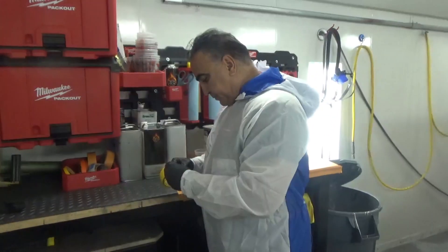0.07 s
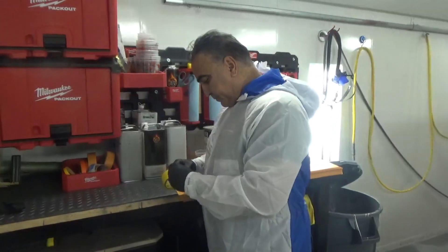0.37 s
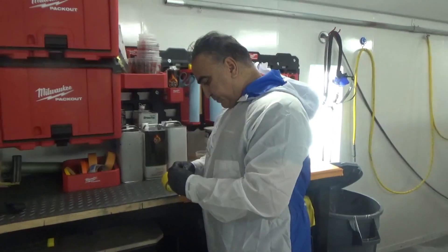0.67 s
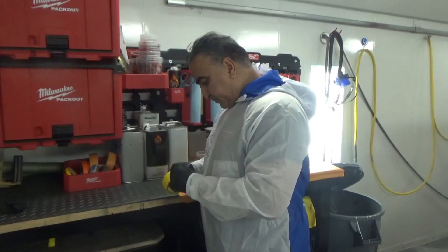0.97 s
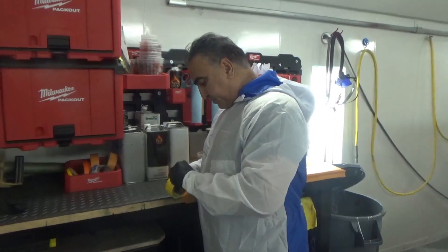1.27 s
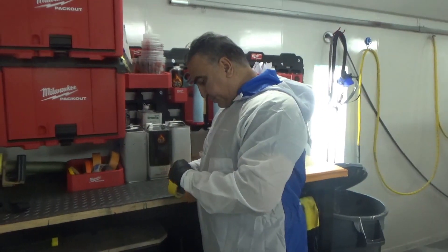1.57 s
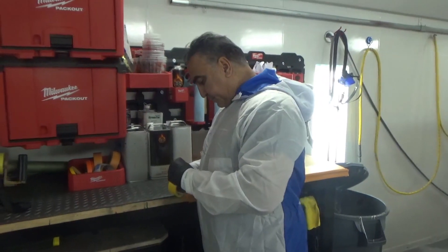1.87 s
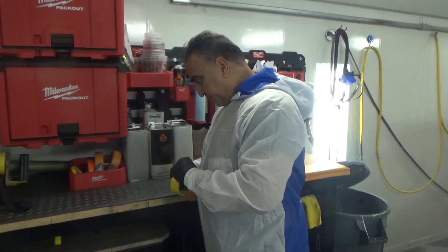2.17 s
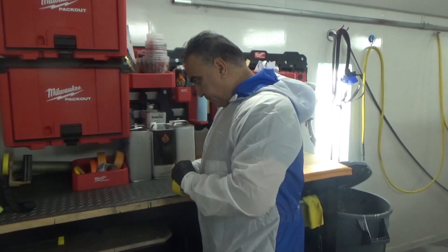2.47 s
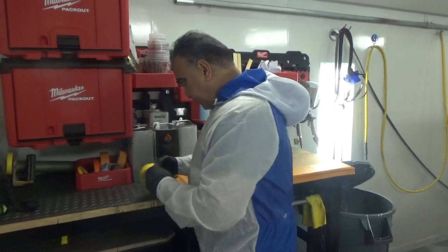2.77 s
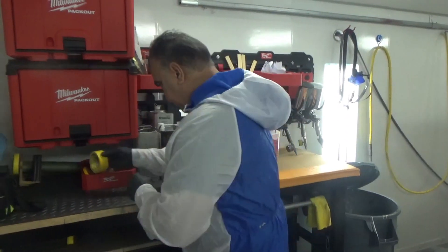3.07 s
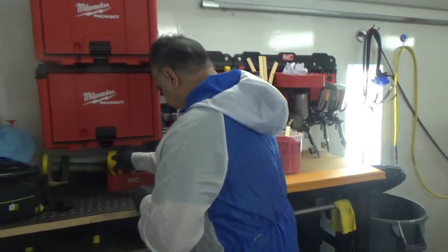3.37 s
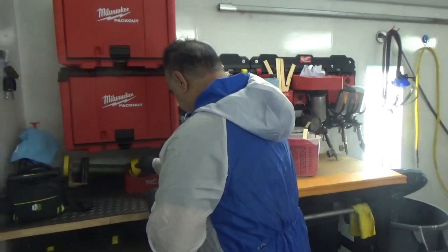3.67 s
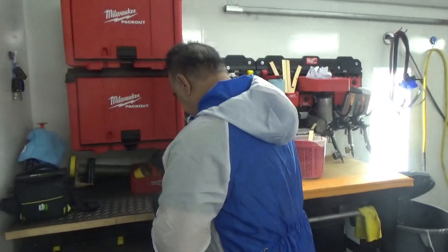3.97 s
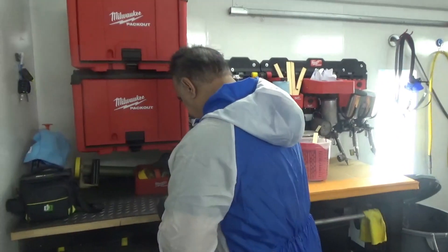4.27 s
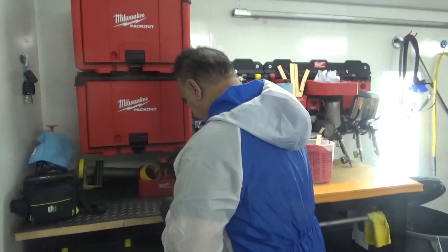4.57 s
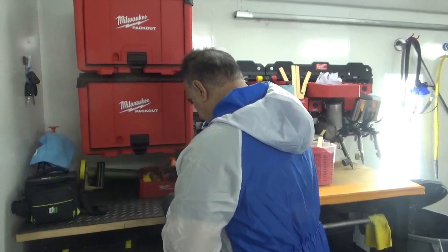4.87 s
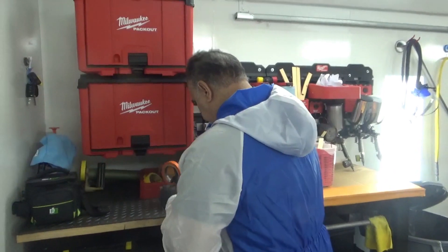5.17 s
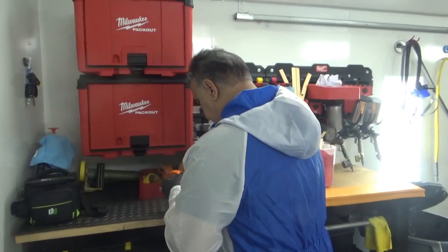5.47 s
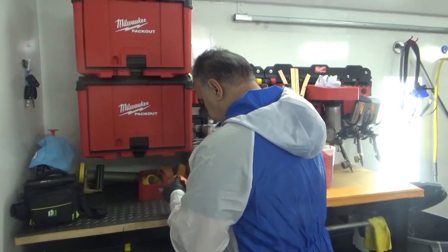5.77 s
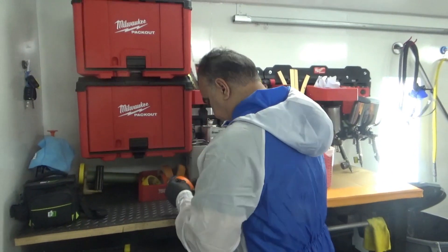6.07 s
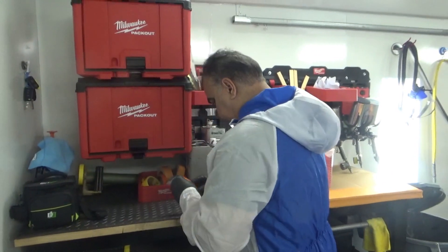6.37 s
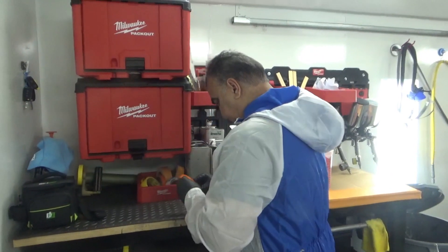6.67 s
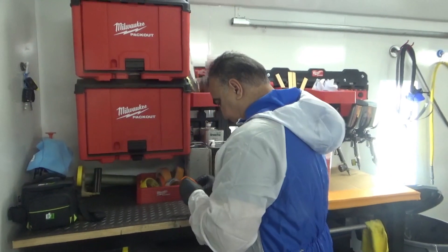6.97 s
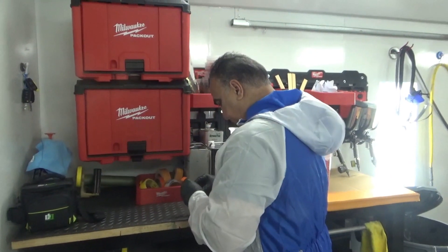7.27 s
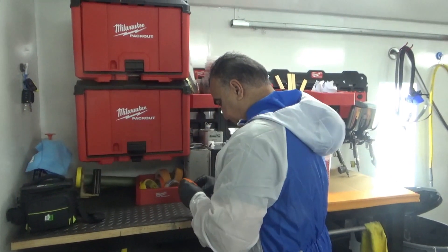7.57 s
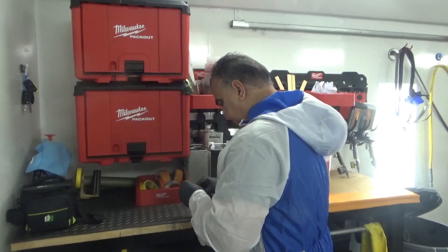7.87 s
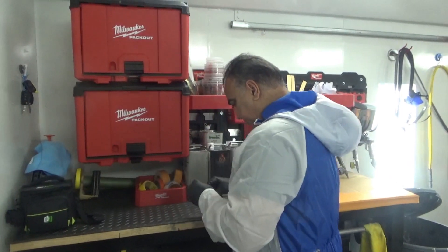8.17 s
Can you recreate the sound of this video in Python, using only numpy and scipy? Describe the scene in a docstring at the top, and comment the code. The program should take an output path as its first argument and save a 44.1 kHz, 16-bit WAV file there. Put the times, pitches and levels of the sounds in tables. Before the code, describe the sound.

Steady airy fan noise and a low hum fill a workshop, briefly joined by soft knocks and rustling as someone rummages.

```python
"""A hard-walled workshop booth, heard on a stereo pair amid steadily running ventilation fans.
Air hisses through the filter grilles and booms in the ducts, over the hum of the chopping blades
and a few thin motor whines. Midway someone rummages on the bench: a sleeve rustles along
a plastic tray and things bump dully in it, each bump ringing briefly off the walls."""
import sys
import numpy as np
from scipy import signal
from scipy.fft import rfft, irfft
from scipy.io import wavfile

SR = 44100
rng = np.random.default_rng(int(sys.argv[2]) if len(sys.argv) > 2 else 0)


def persist_wave(psi):
    """Save psi, clipped to +-1, as 16-bit WAV."""
    counts = np.round(np.clip(psi, -1, 1) * 32767).astype(np.int16)
    wavfile.write(sys.argv[1], SR, np.atleast_2d(counts).T)


N = 366030
TIME, BINS = np.arange(N) / SR, np.fft.rfftfreq(N, 1 / SR)


def airflow(crossover_hz=60):
    """Turbulent air, coloured by the ducts; the deep boom surges while the hiss barely stirs."""
    # rushing air: (frequency [Hz], density [dB per Hz])
    air = [(10, -67), (28, -70), (52, -69), (70, -66), (150, -65), (250, -64.5), (400, -65.5), (700, -64),
           (1050, -65), (3200, -65), (6200, -65), (8600, -65), (9800, -67.5), (11000, -76)]
    # duct resonances: (frequency [Hz], width [Hz], peak density [dB per Hz])
    ducts = [(40, 3.9, -54), (69.7, 5, -62), (86, 6.1, -59.5), (119.6, 4.6, -61.5), (206.3, 3.2, -51),
             (1634, 260, -63.5)]
    # surges of the boom: (time [s], relative level [dB])
    surges = [(0.3, -51), (0.75, -50), (0.88, -44.5), (3.0, -47), (3.07, -42), (5.72, -45.5), (6.76, -55),
              (6.9, -47), (8.0, -46)]
    power = gain_of(spectrum(air)) ** 2 + sum(resonance(*row) ** 2 for row in ducts)
    density = np.sqrt(power) * standing_waves(spacing_hz=11, depth_db=2.5)
    deep_share = 1 / (1 + (BINS / crossover_hz) ** 8)
    boom = noise_pair(density * np.sqrt(deep_share)) * swell(surges)
    hiss = noise_pair(density * np.sqrt(1 - deep_share)) * gain_of(0.12 * drift(rate_hz=2.4))
    return boom + hiss


def fan_hum(shaft_hz=29.25):
    """Four blades chop the air at multiples of the shaft speed; uneven inflow makes each tone flutter."""
    # fan tones: (shaft multiple, level [dB], right over left [dB], left lead [rad], flutter [share])
    tones = [(4, -46, -1, 0.52, 0.31), (8, -29.5, 3.5, 0.63, 0.095), (12, -39, 2, 0.7, 0.24),
             (16, -47, -3, 0.33, 0.2), (19, -54, 3, -0.16, 0.33), (20, -39, 1.5, -0.41, 0.16),
             (23, -51, 1, 0.15, 0.33), (24, -55.5, 0, -0.065, 1)]
    turns = np.cumsum(shaft_hz * (1 + 0.00028 * drift(rate_hz=0.35))) / SR
    out = np.zeros((2, N))
    for multiple, db, right_db, lead, flutter in tones:
        phasor = np.exp(2j * np.pi * (round(multiple) * turns + rng.random()))
        phasor *= 1 + flutter * (drift(rate_hz=8.7) + 1j * drift(rate_hz=2.4)) / np.sqrt(2)
        mics = np.array([[gain_of(-right_db / 2)], [gain_of(right_db / 2) * np.exp(-1j * lead)]])
        out += np.sqrt(2) * gain_of(db) * (mics * phasor).real
    return out


def tray_bumps():
    """Each soft blow sets the tray's short modes ringing together, centred between the microphones."""
    # blows: (time [s], peak level [dB], brightness [dB per octave])
    blows = [(3.223, -20, -2), (3.812, -19, -2), (4.422, -25, -1), (4.546, -14.5, 2), (4.571, -20, 9),
             (4.822, -18, -1.5), (4.844, -20, 5), (4.886, -14.5, 0), (4.936, -22, 3), (4.963, -20.5, 5)]
    # modes of the plastic tray: (frequency [Hz], relative level [dB], t60 [s])
    modes = [(180, -3, 0.045), (294, 1, 0.05), (408, 5, 0.032), (494, 3.5, 0.042), (584, 4.5, 0.029),
             (690, 7, 0.022), (870, 4.5, .03), (968, -0.5, 0.032), (1610, -2, .02)]
    t, out = np.arange(SR // 4) / SR, np.zeros(N)
    for start, db, tilt_db in blows:
        ring = np.zeros(len(t))
        for hz, mode_db, t60 in modes:
            decay = gain_of(mode_db + tilt_db * np.log2(hz / 500) - 60 * t / t60)
            detuned_hz = hz * (1 + 0.029 * rng.standard_normal())
            ring += decay * np.sin(2 * np.pi * detuned_hz * t)
        ring *= 1 - np.exp(-t / 0.0053)  # a soft contact takes a moment to build
        add(out, start, gain_of(db) * ring / abs(ring).max())
    return out


def sleeve_rustle():
    """Cloth catches and slips during each stroke, so the rubbing comes in small clumps."""
    # colour of the rubbing: (frequency [Hz], relative density [dB])
    colour = [(40, -35), (170, 1), (560, -3), (720, -7), (920, -10), (1300, -5.5), (3000, -35),
              (10000, -37)]
    # strokes along the tray: (start [s], length [s], level [dB])
    strokes = [(3.8, .12, -36), (4.393, 0.3, -36.5), (4.82, .16, -31.5)]
    clumps = gain_of(1.4 * np.tanh(drift(rate_hz=45)))
    pressure = sum(gain_of(db) * stroke(start, length) for start, length, db in strokes)
    return unit_rms(noise_pair(gain_of(spectrum(colour))) * clumps) * pressure


def stroke(start, length, attack_s=0.025, release_s=0.04):
    """A stroke builds up, holds while the arm moves and dies away."""
    attack = np.clip((TIME - start) / attack_s, 0, 1)
    return attack * np.exp(-np.maximum(TIME - start - length, 0) / release_s)


def grilles():
    """Each filter grille sings breathily and swells by itself in the turbulent stream."""
    # grille resonances: (frequency [Hz], width [Hz], peak density [dB per Hz])
    bands = [(2074, 280, -62.5), (4870, 490, -65), (5460, 83, -70.5), (7380, 800, -69), (7840, 430, -69.5)]
    air = rfft(noise_pair(standing_waves(spacing_hz=16, depth_db=3.5)))
    return sum(irfft(air * resonance(*row), N) * unit_rms(gain_of(drift(rate_hz=8.4))) for row in bands)


def eddy_whistles(eddies_per_s=1.4, eddy_s=0.25, level_db=-41.5, spread_db=6):
    """Eddies pass at random; each sharpens one grille's hiss into a faint short whistle."""
    # whistling grilles: (frequency [Hz])
    pitches = [4840, 7800]
    out = np.zeros(N)
    for hz in pitches:
        tone = unit_rms(irfft(rfft(rng.standard_normal(N)) * resonance(hz, width_hz=100, db=0), N))
        arrivals = rng.random(N) < eddies_per_s / len(pitches) / SR
        strength = gain_of(level_db + spread_db * rng.uniform(-1, 1, N))
        out += tone * signal.oaconvolve(arrivals * strength, np.hanning(round(eddy_s * SR)), "same")
    return out


def motor_whine():
    """Faint high tones of the motors fade in and out in the moving air."""
    # whines: (frequency [Hz], level [dB])
    whines = [(1669, -54), (2135, -49), (2340, -57), (3481, -54.5), (5440, -56), (7586, -53), (9709, -70),
              (9826, -55)]
    out = np.zeros(N)
    for hz, db in whines:
        phase = 2 * np.pi * hz * TIME + drift(rate_hz=3.7)
        out += gain_of(db) * unit_rms((1 + 0.5 * drift(rate_hz=3.7)) * np.sin(phase))
    return out


def booth_echo(x):
    """Dense reflections off the walls, different at each microphone, the treble dying first."""
    # ring of the booth: (frequency [Hz], t60 [s])
    ring_times = [(150, 0.33), (1000, .3), (8000, 0.15)]
    hz, t, noise = signal.stft(rng.standard_normal((2, SR // 2)), SR, nperseg=256)
    decay = gain_of(-60 * t / spectrum(ring_times, hz)[:, None])
    tail = signal.istft(noise * decay, SR, nperseg=256)[1]
    return signal.fftconvolve(x[None], tail / np.linalg.norm(tail[0]), axes=1)[:, :N]


def standing_waves(spacing_hz, depth_db):
    """The booth's crowded modes lay a fine, unmoving ripple on the spectrum of steady noise."""
    knots = np.arange(0, SR / 2, spacing_hz)
    ripple = np.interp(BINS, knots, rng.standard_normal(N)[:len(knots)])
    return gain_of(depth_db * ripple * BINS / (BINS + 200))


def noise_pair(density):
    """Noise of the given amplitude per root Hz, partly alike at two microphones in a diffuse room."""
    # likeness of the two sides: (frequency [Hz], coherence [0-1])
    coherence = [(40, 1), (230, 0.92), (450, 0.7), (1000, 0.47), (2100, 0.57), (2900, 0.6), (5000, .73),
                 (10000, .8)]
    # balance: (frequency [Hz], left over right [dB])
    balance = [(50, 0.5), (220, -3.5), (1100, -2.5), (2100, -0.7), (3500, -1.3), (6000, -0.6), (10000, .2)]
    # arrival at the pair: (frequency [Hz], left lead [rad])
    lead = [(30, 0), (150, 0.63), (400, 0.89), (700, 0.024), (3800, -0.48), (7700, -0.093), (10000, -0.09)]
    left, other = rfft(rng.standard_normal((2, N))) * np.sqrt(SR / 2)
    same = np.clip(spectrum(coherence), 0, 1)
    right = (same * left + np.sqrt(1 - same ** 2) * other) * np.exp(-1j * spectrum(lead))
    lean = gain_of(spectrum(balance) / 2)
    return irfft(np.array([left * lean, right / lean]) * density, N)


def resonance(hz, width_hz, db):
    """Amplitude per root Hz of noise that passes one resonance twice."""
    return gain_of(db) / (1 + ((BINS - hz) / width_hz) ** 2)


def drift(rate_hz):
    """A random wander of rms 1, no faster than about the given rate."""
    coarse = TIME[::64]
    hz = np.fft.rfftfreq(len(coarse), coarse[1])
    slow = irfft(rfft(rng.standard_normal(len(coarse))) * np.exp(-(hz / rate_hz) ** 2), len(coarse))
    return unit_rms(np.interp(TIME, coarse, slow))


def swell(points):
    """A level curve over time as a gain of rms 1."""
    return unit_rms(gain_of(np.interp(TIME, *np.transpose(points))))


def spectrum(points, hz=BINS):
    """A table joined by lines on a log-frequency axis."""
    knots, values = np.transpose(points)
    return np.interp(np.log(hz + 1), np.log(knots + 1), values)


def gain_of(db):
    """Decibels to a factor."""
    return 10 ** (np.asarray(db) / 20)


def unit_rms(x):
    """The same signal at rms 1."""
    return x / np.sqrt(np.mean(x ** 2) + 1e-20)


def add(mix, start_s, sound):
    """Mixes a sound in, starting at a time."""
    part = mix[round(start_s * SR):][:len(sound)]
    part += sound[:len(part)]


def scene():
    """The fans fill the booth around the microphones; the rummaging sits just above them in level."""
    bumps = tray_bumps()
    fans = airflow() + grilles() + eddy_whistles() + fan_hum() + motor_whine()
    echo = gain_of(-7) * booth_echo(bumps)
    return fans + sleeve_rustle() + bumps + echo


def record(dry, cutoff_hz=11120):
    """The recorder cuts the top treble steeply on both channels."""
    taps = signal.firwin(1023, cutoff_hz, window=("kaiser", 9), fs=SR)
    return signal.oaconvolve(dry, taps[None], "same", axes=1)


dry = scene()
out = record(dry)
persist_wave(out)
```